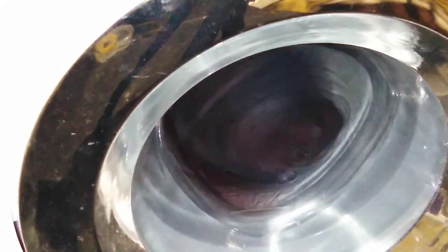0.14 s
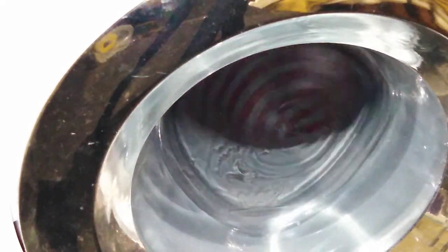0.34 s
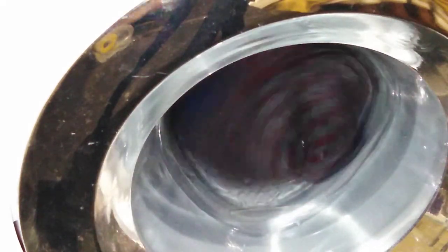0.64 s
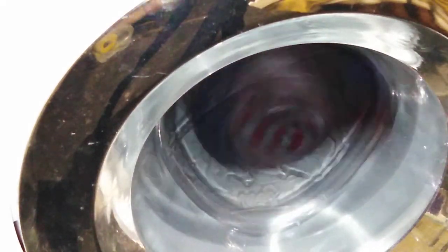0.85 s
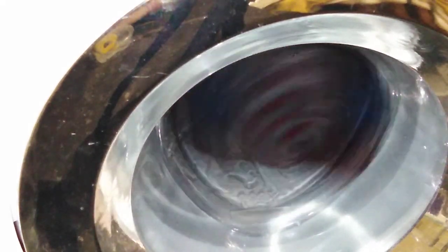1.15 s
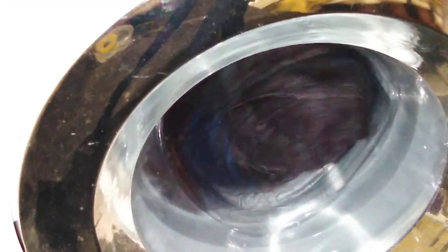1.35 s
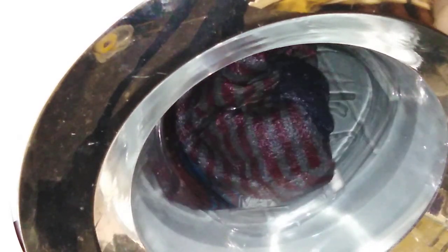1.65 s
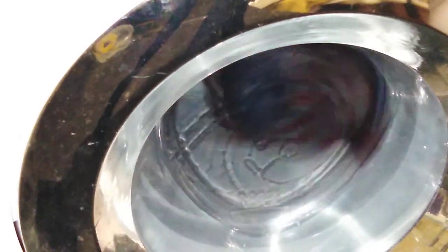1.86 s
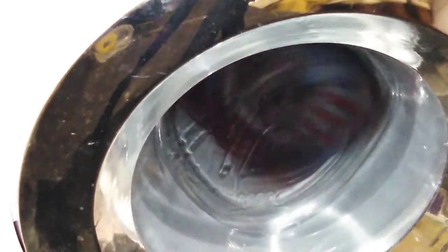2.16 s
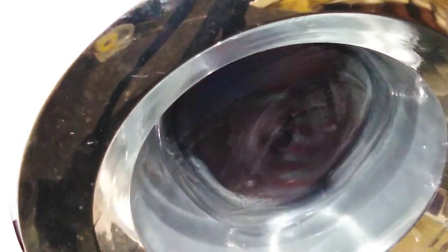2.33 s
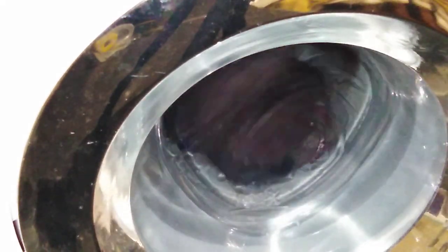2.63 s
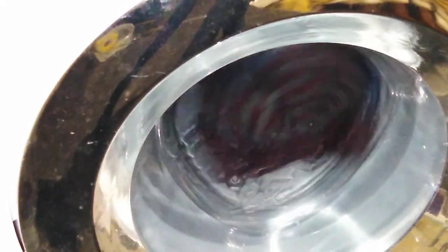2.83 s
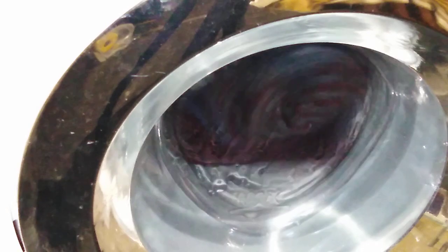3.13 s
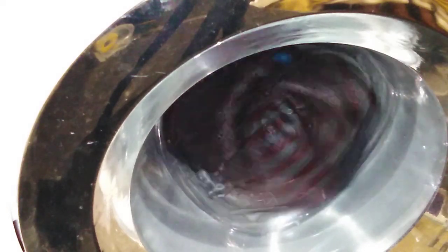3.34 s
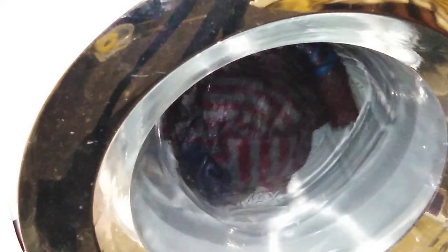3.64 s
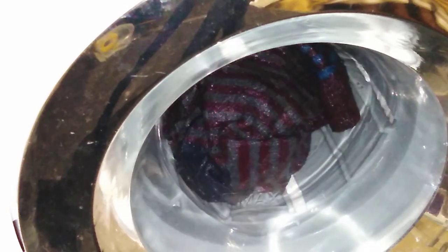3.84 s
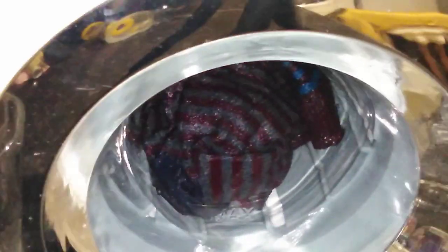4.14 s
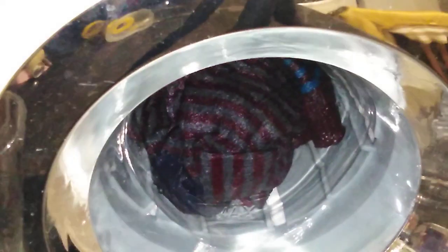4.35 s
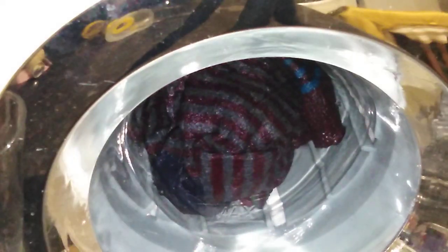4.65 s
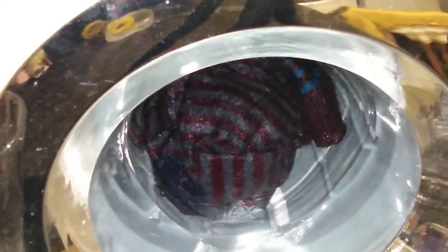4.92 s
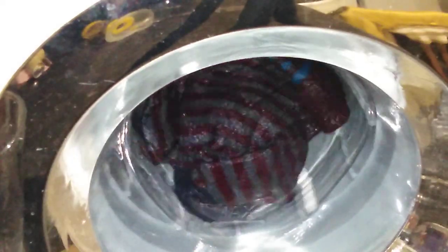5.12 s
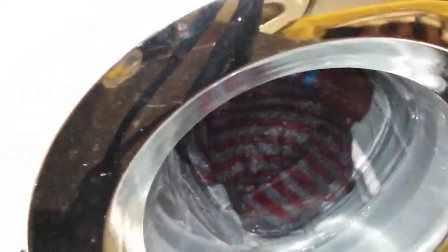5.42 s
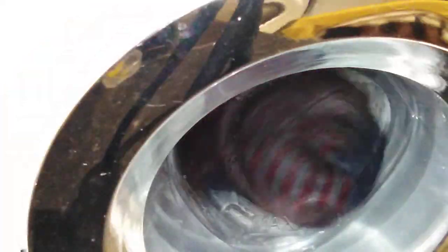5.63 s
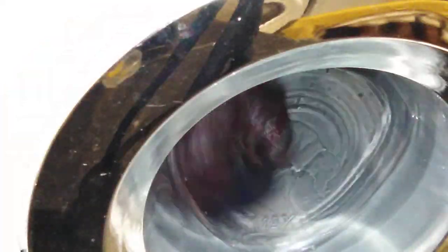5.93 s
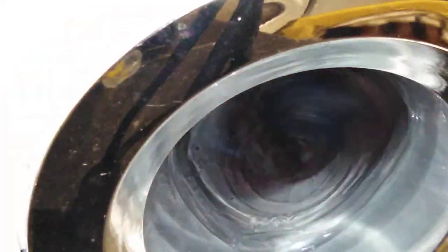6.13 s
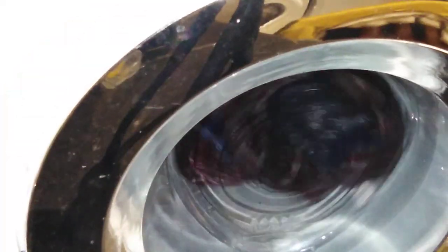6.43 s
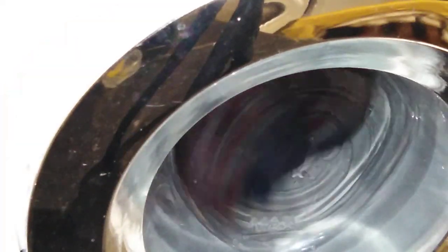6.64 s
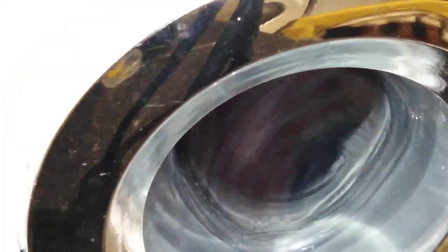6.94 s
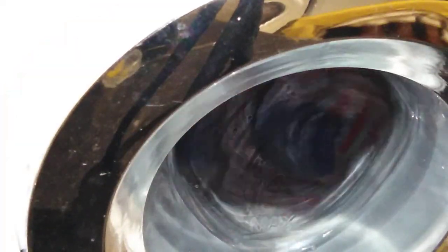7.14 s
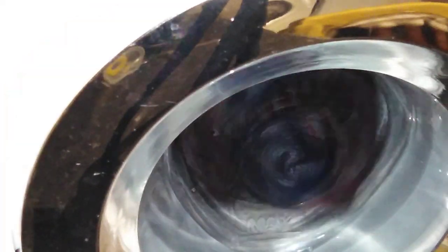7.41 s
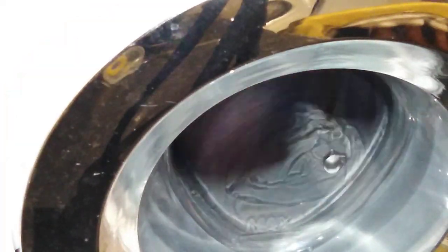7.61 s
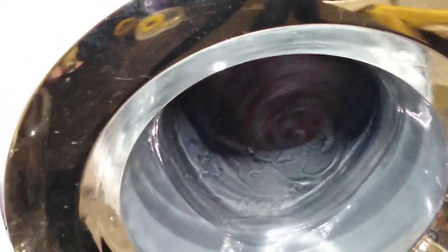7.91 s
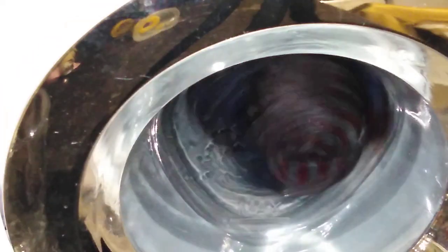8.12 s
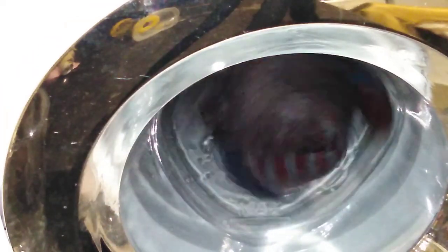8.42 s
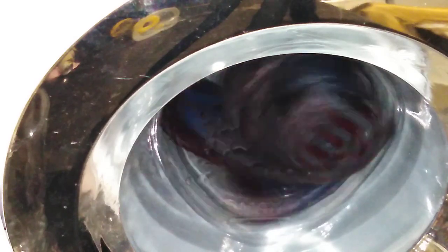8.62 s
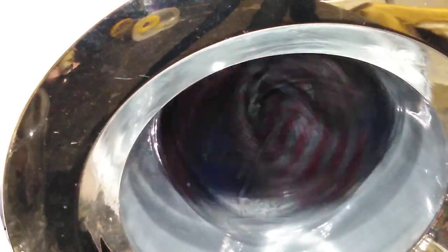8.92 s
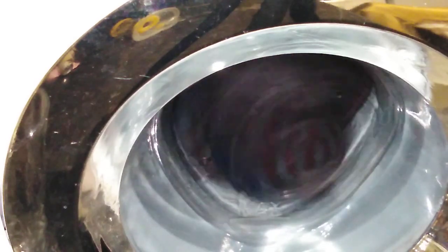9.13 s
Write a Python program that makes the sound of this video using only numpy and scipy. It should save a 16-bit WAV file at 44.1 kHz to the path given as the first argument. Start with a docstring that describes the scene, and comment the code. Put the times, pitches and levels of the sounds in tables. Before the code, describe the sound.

Wet laundry thuds round a small plastic tub as hard bits knock, water sloshes and hisses, and a late thin squeak slides down.

```python
"""Water sloshes and hisses over a low rumble, and at once wet laundry starts thudding round a plastic tub:
a toy washing machine from close by. Hard bits knock on the wall, a loose metal piece rings as it rolls,
wet plops sound, and near the end the drum squeaks once, in a small room. Water and knocks are shaped noise;
thuds, handling bumps and clinks are decaying modes; the metal is swelling sines over noise; plops and squeak glide."""
import sys
import numpy as np
from scipy import signal
from scipy.fft import rfft, irfft, next_fast_len
from scipy.io import wavfile
from scipy.ndimage import uniform_filter1d

SR = 44100
rng = np.random.default_rng(int(sys.argv[2]) if len(sys.argv) > 2 else 0)


def store_pcm(level_fs):
    """Save levels as 16-bit WAV."""
    pcm = np.round(np.clip(level_fs, -1, 1) * 32767).astype(np.int16)
    wavfile.write(sys.argv[1], SR, np.atleast_2d(pcm).T)


N = 408807

# Table levels are relative, ahead of the mix gains; ring() scatters the modes it plays from blow to blow.
# water and cloth: (time [s], slosh [dB], hiss [dB], rumble [dB])
WATER_LEVELS = [(0, -33.5, -38.5, -35), (0.219, -53, -55.5, -51), (.38, -48, -54, -44),
                (.56, -51, -97, -45.5), (.75, -46, -46, -40), (1.75, -44.5, -46.5, -38.5),
                (3.49, -44, -49.5, -38.5), (4.2, -51.5, -52.5, -53), (4.601, -59, -45, -53.5),
                (5.0, -44.5, -49, -39.5), (5.2, -54.5, -63, -50.5), (5.318, -45.5, -48, -44.5),
                (6.1, -44.5, -52.5, -40.5), (7.896, -43, -45, -35), (8.2, -40.5, -51, -43.5),
                (8.39, -57.5, -61, -43), (8.5, -53, -49.5, -42.5), (8.82, -52, -58.5, -48),
                (9.05, -52.5, -48, -41), (9.23, -47.5, -68, -45.5)]
# colours of the three water layers: (frequency [Hz], density [dB per Hz])
SLOSH_COLOUR = [(350, 1.5), (1100, 2), (3500, -28)]
HISS_COLOUR = [(1200, -8), (2500, -3), (6800, -1.5), (8500, -10), (14300, -21.5)]
RUMBLE_COLOUR = [(40, -11.5), (120, 10.5), (190, 13), (255, -3), (315, 12.5), (600, -78.5)]
# soft laundry thuds: (time [s], level [dB], low modes over high modes [dB])
LAUNDRY_THUDS = [(0.051, -28.5, 2), (0.4, -30.5, 4), (0.577, -27.5, 4.5), (0.737, -23.5, 2.5),
                 (1.111, -21.5, 0.5), (1.688, -15.5, -8), (1.728, -20, -7), (2.259, -24, 8),
                 (2.513, -15.5, -4), (2.687, -21, -2), (2.78, -19.5, -1), (3.122, -34.5, 10),
                 (3.182, -20, 1.5), (3.52, -14, -18), (3.974, -43, 14), (4.03, -17.5, -10.5),
                 (4.276, -34.5, 4), (4.64, -24.5, -5), (4.74, -21, 0.5), (5.061, -32.5, 3.5),
                 (5.363, -19, 5), (5.733, -21.5, -0.5), (5.853, -29, 4.5), (6.204, -31.5, 8),
                 (6.586, -21, 2), (6.905, -23, -5), (7.058, -25.5, 7.5), (7.256, -18.5, 5.5),
                 (7.712, -23, -3), (7.775, -23.5, -2), (8.05, -31, 12), (8.269, -33, 7),
                 (8.403, -28.5, 8.5), (8.773, -39.5, 10), (8.844, -27.5, 2), (9.188, -32, 4)]
# low and high tub modes, then wall modes: (frequency [Hz], level [dB], t60 [s])
TUB_LOW_MODES = [(119.2, -2, 0.3), (158, 8, 0.14), (180, 4, 0.22), (217, 5, .16)]
TUB_HIGH_MODES = [(297, -3, 0.22), (322, 5.5, 0.2), (410, -12, 0.2)]
WALL_MODES = [(632, 5, 0.23), (736, 21.5, 0.045), (958, 16.5, 0.074), (1101, 14, 0.096), (1587, 19, 0.047)]
# handling bumps: (time [s], level [dB])
HANDLING_BUMPS = [(1.181, -23), (1.268, -19), (7.742, -24.5), (7.971, -14)]
# low modes of the handling bumps: (frequency [Hz], level [dB], t60 [s])
HANDLING_MODES = [(66, -4, .18), (88, 0, .18)]
# hard knocks: (time [s], level [dB], brightness before band scaling [dB], t60 of the middle band [s])
HARD_KNOCKS = [(0.5785, -34.5, -3, 0.24), (0.643, -34, -4.5, 0.1), (0.684, -30.5, 8, 0.091),
               (0.7428, -25.5, 1, 0.24), (0.7949, -18, 3.5, 0.067), (0.863, -36.5, 17.5, 0.065),
               (1.006, -18, 3.5, 0.087), (1.105, -16, 9.5, 0.053), (1.6246, -26.5, -2.5, 0.34),
               (1.727, -28, 10, 0.036), (1.889, -31, 4, 0.14), (1.908, -24, 6.5, 0.14),
               (1.9194, -19.5, 4, 0.23), (2.0325, -29, 1, 0.12), (2.1378, -46, -11.5, 0.043),
               (2.2042, -19, 7, 0.11), (2.2555, -24.5, 1, 0.12), (2.322, -31.5, 4, 0.19),
               (2.3496, -27, -0.5, 0.092), (2.5106, -16.5, 0.5, 0.13), (2.7874, -23, 0, 0.071),
               (3.218, -25.5, -2, 0.07), (3.3324, -18, 6, 0.085), (3.504, -22.5, 1, 0.2),
               (3.5185, -11.5, 5.5, 0.19), (3.576, -19, 1.5, 0.091), (3.7358, -11.5, 4, 0.08),
               (4.0262, -19, 4, 0.099), (4.661, -14, 5.5, 0.35), (4.7599, -13, 5, 0.25),
               (4.9193, -19.5, 4.5, 0.086), (5.332, -25, 4, 0.14), (5.359, -17.5, -1, 0.063),
               (5.6074, -32, -13, 1), (5.68, -24.5, -1, 0.69), (5.811, -21, 5, 0.41), (5.883, -24, 3, 0.18),
               (6.317, -23, -1.5, 0.72), (6.3868, -21, 7, 0.056), (6.4503, -15.5, 2, 0.097),
               (6.572, -30, -2, 0.089), (6.586, -19, 4.5, 0.14), (6.6545, -34, -5.5, 0.049),
               (6.81, -34.5, -5, 0.066), (6.8545, -29, 0, 0.54), (6.943, -27, -0.5, 0.05),
               (7.0558, -21.5, 3.5, 0.067), (7.138, -20.5, -1, 0.06), (7.2495, -16.5, 1.5, 0.11),
               (7.2955, -22.5, -2, 0.086), (7.367, -22.5, -1.5, 0.14), (7.5895, -23, 2.5, 0.22),
               (7.709, -26, 1.5, 0.23), (7.918, -32.5, -2, 0.35), (7.99, -35.5, -7.5, 0.073),
               (8.0645, -36, -9, 0.11), (8.845, -40, -3.5, 0.13), (8.4037, -39.5, -6, 0.19)]
# colour of the knock bursts: (frequency [Hz], density [dB per Hz])
KNOCK_COLOUR = [(350, 19.5), (600, 5), (5000, -9), (9000, -23.5), (14300, -31.5)]
# passes of the rolling metal piece, each a list of (time [s], level [dB], face modes over the rest [dB])
ROLL_PASSES = [
    [(.862, -30.5, 2), (1.0, -60.5, 0)],
    [(1.105, -27.5, 7), (1.17, -25.5, 2.5), (1.29, -28.5, 9), (1.36, -27.5, 14), (1.45, -30.5, 9.5),
     (1.68, -60.5, 13)],
]
# face modes and upper modes of the piece: (frequency [Hz], level [dB])
FACE_MODES = [(6528, -1), (11183, -16), (11312, -21)]
UPPER_MODES = [(2439, -13), (4357, -8), (5606, 0), (5977, -5), (7892, -4), (8280, -4), (8784, -14),
               (9405, -7), (10118, -8), (12921, -12), (13611, -11), (14210, -11)]
# grit of the rolling piece: (frequency [Hz], density [dB per Hz])
GRIT_COLOUR = [(700, -4), (2500, -0.5), (8400, -3.5), (9300, -24)]
# blows of a second, duller piece: (time [s], level [dB])
CLINK_BLOWS = [(3.521, -20), (4.6636, -14), (4.765, -13)]
# modes of that piece: (frequency [Hz], level [dB], t60 [s])
CLINK_MODES = [(6137, -3, .25), (11450, 0, .1), (11950, -1, .08)]
# pockets of air ringing in the water: (time [s], level per bubble [dB], centre pitch [Hz])
AIR_POCKETS = [(5.608, -28, 955), (5.954, -29, 723), (7.504, -30.5, 966), (8.068, -30.5, 630)]
# squeak of the drum: (time [s], pitch [Hz], level [dB])
SQUEAK_GLIDE = [(8.775, 4030, -61), (8.81, 3910, -44.5), (8.926, 3820, -49.5), (9.005, 3310, -49),
                (9.035, 3010, -46), (9.091, 2890, -47), (9.235, 2820, -55)]
# how alike the noise is at both ports: (frequency [Hz], left-right likeness [0 to 1])
PORT_LIKENESS = [(60, 0.66), (150, 0.93), (300, 1), (700, 0.017), (15000, 0.0067)]
# decay of the room: (frequency [Hz], t60 [s])
ROOM_DECAY = [(500, 0.38), (12000, 0.35)]

LAG = 9  # samples by which the left port hears late
EDGE_HZ = 15600  # upper band limit
# dull knocks carry more body, long scrapes less; bright knocks carry more sheen
BODY_DB, BODY_PER_BRIGHT, SCRAPE_DB_PER_S = -8, -1.25, -24
SHEEN_DB, SHEEN_PER_BRIGHT = -6, 1.28
PLOP_T60, PLOP_RISE = 0.075, 0.17  # s; share by which the pitch climbs in one t60


def gain_of(db):
    """Decibels to amplitude."""
    return 10 ** (np.asarray(db) / 20)


def evened(x):
    """Scales to rms 1."""
    return x / np.sqrt(np.mean(x ** 2) + 1e-20)


def read(points, hz):
    """Reads a table on a log-frequency axis."""
    f, value = np.transpose(points)
    return np.interp(np.log(hz + 1), np.log(f + 1), value)


def add(mix, s, sound):
    """Mixes a sound in at s seconds."""
    part = mix[..., round(s * SR):][..., :sound.shape[-1]]
    part += sound[..., :part.shape[-1]]


def drift(rate, count):
    """Slow chance of about rms 1: random knots through a low-pass with its corner at rate Hz."""
    step = 60  # samples per knot
    knots = rng.standard_normal(count // step + 2)
    pole = np.exp(-2 * np.pi * rate * step / SR)
    smooth = evened(signal.detrend(signal.lfilter([1], [1, -pole], knots)))
    return np.interp(np.arange(count) / step, np.arange(len(knots)), smooth)


def noise(spectrum, lo_hz=0, hi_hz=SR):
    """Coloured noise at both ports: partly shared, the left a little late."""
    size = next_fast_len(N)
    hz = np.fft.rfftfreq(size, 1 / SR)
    a, b = rfft(rng.standard_normal((2, size)))
    same = np.clip(read(PORT_LIKENESS, hz), 0, 1)
    left = (same * a + np.sqrt(1 - same ** 2) * b) * np.exp(-2j * np.pi * hz * LAG / SR)
    edges = 1 / np.sqrt((1 + (lo_hz / (hz + 1)) ** 6) * (1 + (hz / hi_hz) ** 6))
    coloured = np.array([left, a]) * gain_of(read(spectrum, hz)) * edges
    return evened(irfft(coloured, size)[:, :N])


def patchy(x, patch_db):
    """Colour that changes from moment to moment, so splashes and knocks favour other resonances."""
    z = signal.stft(x, nperseg=512)[2]
    patches = uniform_filter1d(rng.standard_normal(z.shape[1:]), size=3, axis=0)  # across frequency
    patches = uniform_filter1d(patches, size=7, axis=1)  # along time
    return evened(signal.istft(z * gain_of(patch_db * evened(patches)), nperseg=512)[1][:, :N])


def ring(modes, rise_s, spread=.018):
    """One blow, peak 1: each wakes the modes unevenly, and spread shifts their pitches a little."""
    t = np.arange(SR // 2) / SR
    luck = rng.standard_normal((len(modes), 3))
    out = np.zeros(len(t))
    for (hz, db, t60), (strength, shift, phase) in zip(modes, luck):
        fall = gain_of(db + 4.0 * strength - 60 * t / t60)
        out += fall * np.sin(2 * np.pi * hz * (1 + spread * shift) * t + phase)
    out = out * (1 - np.exp(-t / rise_s))
    return out / abs(out).max()


def ports(x):
    """One source at both ports, the left late."""
    return np.array([np.roll(x, LAG), x])


def water():
    """Lumpy slosh and the smoother hiss of running water, over the rumble of the tub: drifting noise."""
    s, *levels = np.transpose(WATER_LEVELS)
    slosh_db, hiss_db, rumble_db = (np.interp(np.arange(N) / SR, s, c) for c in levels)
    slosh = evened(patchy(noise(SLOSH_COLOUR), 4.5) * gain_of(3.0 * drift(25.0, count=N)))
    hiss = evened(patchy(noise(HISS_COLOUR), 2.7) * gain_of(2.5 * drift(8.0, count=N)))
    rumble = evened(noise(RUMBLE_COLOUR) * gain_of(5.1 * drift(4.6, count=N)))
    return gain_of(slosh_db) * slosh + gain_of(hiss_db) * hiss + gain_of(rumble_db) * rumble


def thuds():
    """Wet cloth slaps the wall, whose modes ring, and booms in the tub, alike at both ports."""
    out, slap = np.zeros(N), np.zeros(N)
    for s, db, low_db in LAUNDRY_THUDS:
        boom = ring(TUB_HIGH_MODES, 0.0036) + gain_of(low_db) * ring(TUB_LOW_MODES, 0.0057)
        add(out, s, gain_of(db) * boom)
        add(slap, s, gain_of(db - 4.5) * ring(WALL_MODES, 0.0022))
    return out + ports(slap)


def knocks():
    """Each knock is a rattling burst that dies fast, treble first, and sets the tub wall ringing."""
    t = np.arange(SR // 2) / SR
    power, wall = np.zeros((3, N)), np.zeros(N)
    for s, db, bright_db, t60 in HARD_KNOCKS:
        body_db = BODY_DB + BODY_PER_BRIGHT * bright_db + SCRAPE_DB_PER_S * t60
        sheen_db = SHEEN_DB + SHEEN_PER_BRIGHT * bright_db
        swell = 1 - np.exp(-t / (0.000064 + 0.011 * t60 ** 2))  # long ones are scrapes that swell
        shares = [(body_db + 10.0, 1.3), (-4.0, 1), (sheen_db, .65)]  # (dB, times t60)
        for band, (rel_db, longer) in enumerate(shares):
            fall = gain_of(2 * (db + rel_db) - 120 * t / (max(t60, .02) * longer))  # as power
            add(power[band], s, fall * swell)
        add(wall, s, gain_of(db + body_db + 7.0) * ring(WALL_MODES, 0.018))
    body = noise(KNOCK_COLOUR, 660, 2130)
    middle = noise(KNOCK_COLOUR, 1300, 9000)
    sheen = noise(KNOCK_COLOUR, 4980) * gain_of([[-3.0], [0]])  # the right port catches more treble
    bursts = sum(np.sqrt(p) * patchy(b, 3.85) for p, b in zip(power, [body, middle, sheen]))
    bounce = gain_of(2.3 * drift(60.0, count=N))  # the bits bounce unevenly
    return bursts * bounce + ports(wall)


def rolling_metal():
    """Narrow modes swell and fade as the piece turns, over its rattle; a duller piece clinks."""
    out, rattle = np.zeros((2, N)), patchy(noise(GRIT_COLOUR), 5)
    for rows in ROLL_PASSES:
        s, *levels = np.transpose(rows)
        t = np.arange(s[0], s[-1], 1 / SR)
        roll_db, face_db = (np.interp(t, s, c) for c in levels)
        grit_db = 3.5 * drift(60.0, count=len(t))
        sound = gain_of(roll_db + grit_db) * rattle[:, :len(t)]
        for modes, level_db in zip([FACE_MODES, UPPER_MODES], [roll_db + face_db, roll_db]):
            for hz, db in modes:
                waver = np.cumsum(12.0 * drift(60.0, count=len(t))) / SR  # pitch wavers by 12 Hz rms
                turn = [gain_of(2.2 * drift(12.0, count=len(t))) for port in range(2)]  # beams unevenly
                phase = 2 * np.pi * (hz * t + waver + rng.random())
                phase = phase + [[np.pi / 2], [0]]  # the ports hear it a quarter turn apart
                sound += gain_of(level_db + db) * turn * np.sin(phase)
        add(out, s[0], gain_of([[3.0], [0]]) * sound * signal.windows.tukey(len(t), .03))
    for s, db in CLINK_BLOWS:
        clink = np.array([ring(CLINK_MODES, 0.00049, spread=0) for port in range(2)])
        add(out, s, gain_of(db) * clink)
    return out


def handling_bumps():
    """Handling bumps, felt mostly at the left port: low decaying modes, drawn apart for each port."""
    out = np.zeros((2, N))
    for s, db in HANDLING_BUMPS:
        bump = [ring(HANDLING_MODES, 0.0045) for port in range(2)]
        add(out, s, gain_of([[db + 4.0], [db - 31.0]]) * bump)
    return out


def plops():
    """Each pocket of air breaks into four bubbles close in time and pitch, which ring briefly and climb."""
    t, out = np.arange(SR // 4) / SR, np.zeros(N)
    envelope = gain_of(-60 * t / PLOP_T60) * (1 - np.exp(-t / 0.00043))
    for s, db, hz in AIR_POCKETS:
        # the first bubble is on time and in tune; columns: delay in s, pitch share
        scatter = rng.uniform(-1, 1, (4, 2)) * np.outer(np.arange(4) > 0, [.02, .22])
        for late, apart in scatter:
            turns = np.cumsum(hz * (1 + apart) * (1 + PLOP_RISE * t / PLOP_T60)) / SR
            add(out, s + abs(late), gain_of(db) * envelope * np.sin(2 * np.pi * turns))
    return ports(out)


def squeak():
    """Stick-slip whistle of three harmonics that slides down and turns husky."""
    s, *columns = np.transpose(SQUEAK_GLIDE)
    t = np.arange(s[0], s[-1], 1 / SR)
    hz, level_db = (np.interp(t, s, c) for c in columns)
    husky = np.clip((t - 8.88) / 0.016, 0, 1)
    turns = np.cumsum(hz * (1 + 0.011 * husky * drift(250.0, count=len(t)))) / SR
    harmonics_db = [3.0, 0, -22]
    tone = sum(gain_of(db) * np.sin(2 * np.pi * (k + 1) * turns) for k, db in enumerate(harmonics_db))
    level = gain_of(level_db + 3.1 * husky * drift(63.0, count=len(t)))
    out = np.zeros(N)
    add(out, s[0], tone * level * signal.windows.tukey(len(t), .06))
    return ports(out)


def room(x):
    """Sparse echoes of random sign, each band dying at its own speed."""
    taps = np.zeros((2, SR // 2))
    starts = np.arange(300, SR // 2 - 20, 20)  # one echo per 20 samples
    at = starts + rng.integers(0, 20, (2, len(starts)))
    np.put_along_axis(taps, at, rng.choice([-1., 1.], at.shape), 1)
    hz, t, z = signal.stft(taps, SR, nperseg=256)
    fall = gain_of(-60 * t / read(ROOM_DECAY, hz)[:, None])
    tail = signal.istft(z * fall, SR, nperseg=256)[1]
    return signal.oaconvolve(x, tail / np.linalg.norm(tail[0]), axes=1)[:, :N]


def scene():
    """The machine, with the room answering its knocks, plops, metal and squeak."""
    bright = knocks() + rolling_metal() + plops() + squeak()
    return water() + thuds() + handling_bumps() + bright + gain_of(-9.0) * room(bright)


def record(dry):
    """The left port is a little quieter; the lows are thinned and the top treble is cut steeply."""
    shelf = signal.firwin2(255, [0, 14300, 14600, SR / 2], [1, 1, .07, .07], fs=SR)
    edge = signal.firwin(255, EDGE_HZ, window=("kaiser", 9), fs=SR)
    dry = signal.lfilter(*signal.butter(2, 68, "high", fs=SR), dry)
    return signal.oaconvolve(dry * gain_of([[-1.2], [0]]), np.convolve(shelf, edge)[None], "same")


dry = scene()
out = record(dry)
store_pcm(out)
```